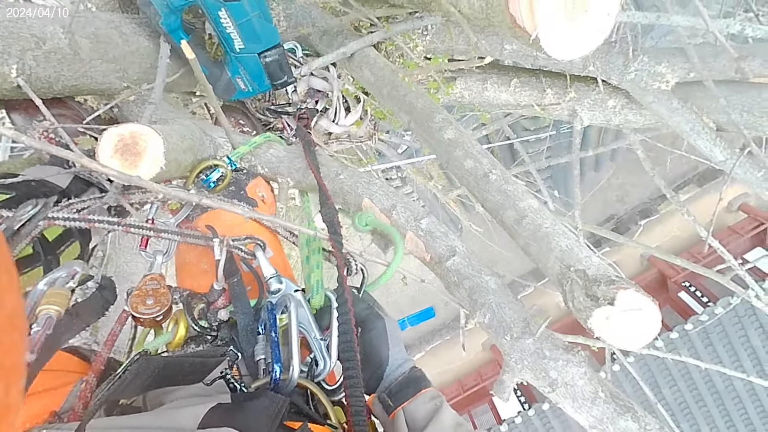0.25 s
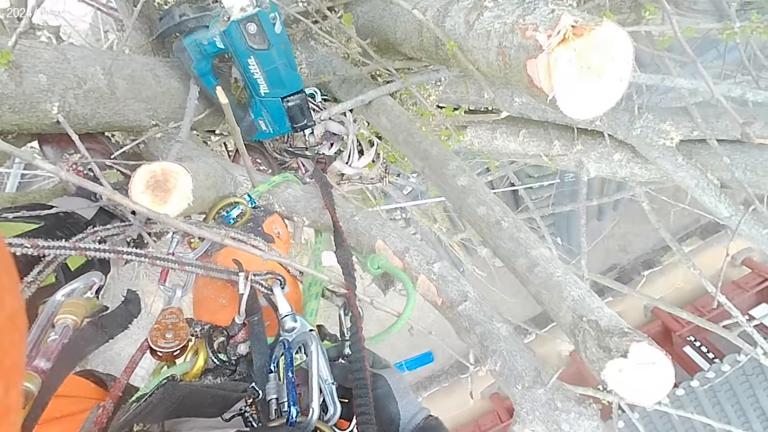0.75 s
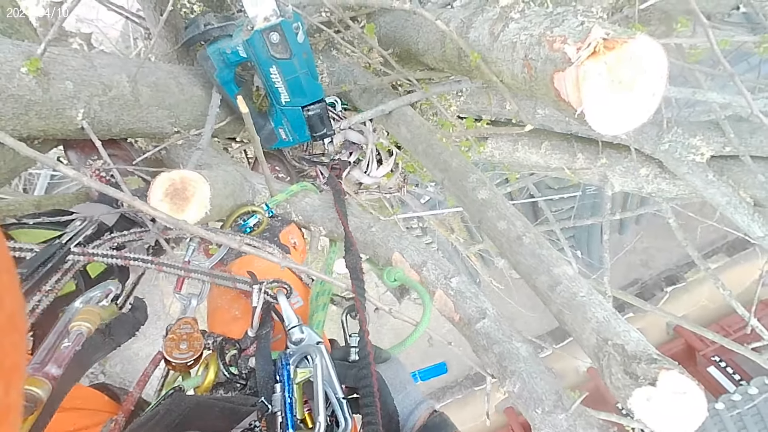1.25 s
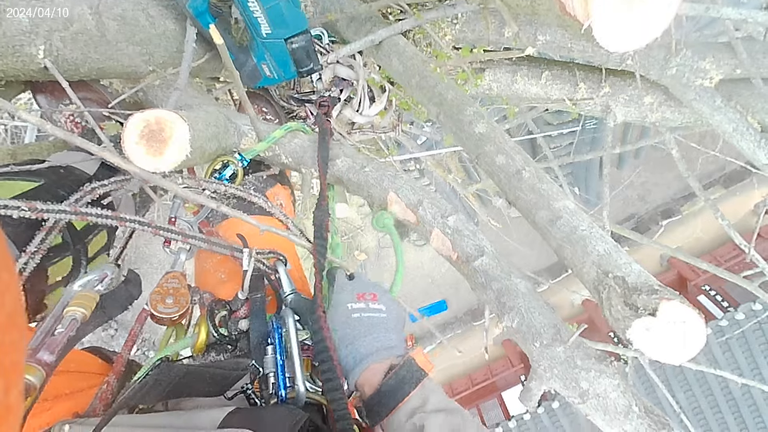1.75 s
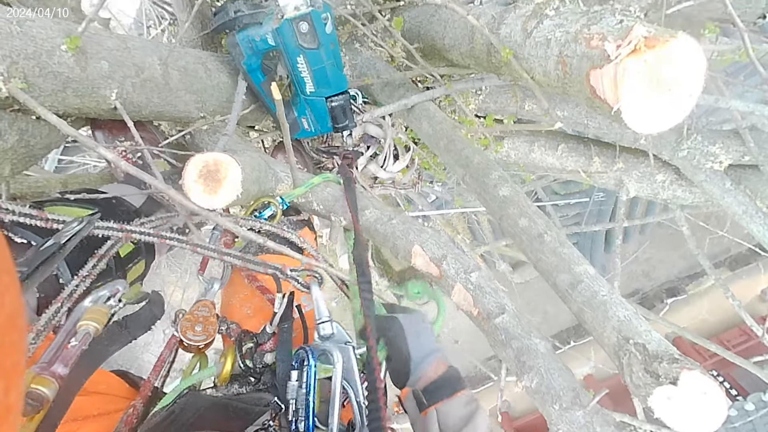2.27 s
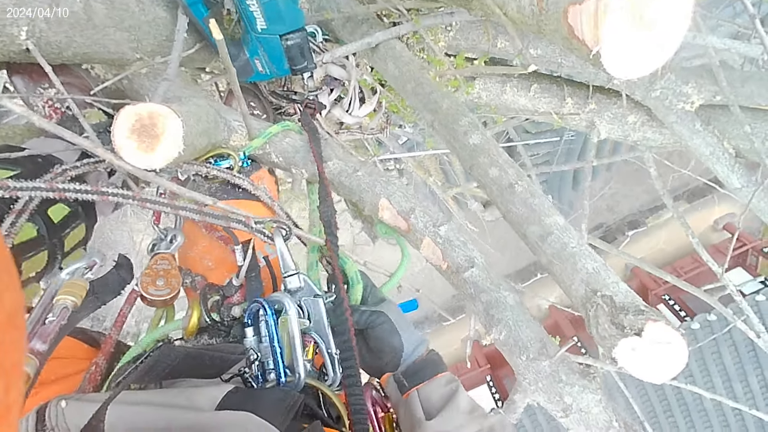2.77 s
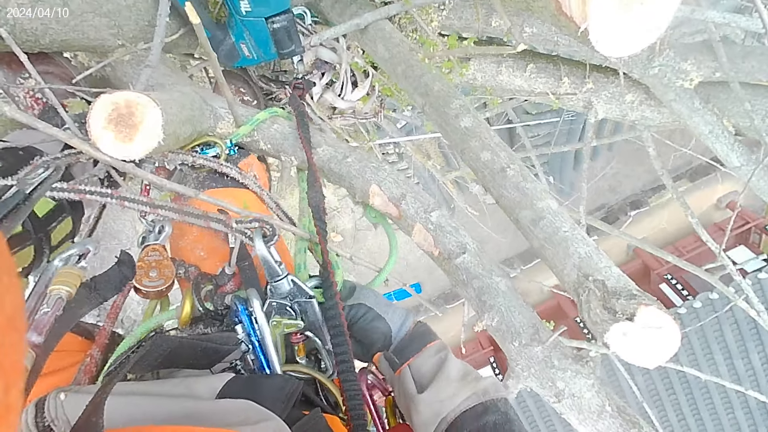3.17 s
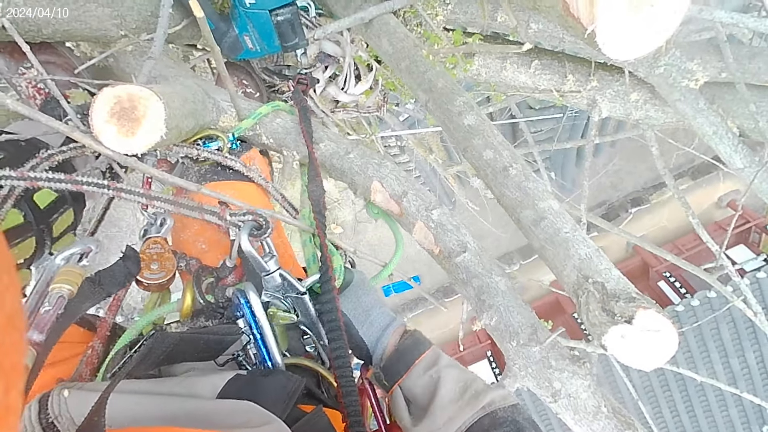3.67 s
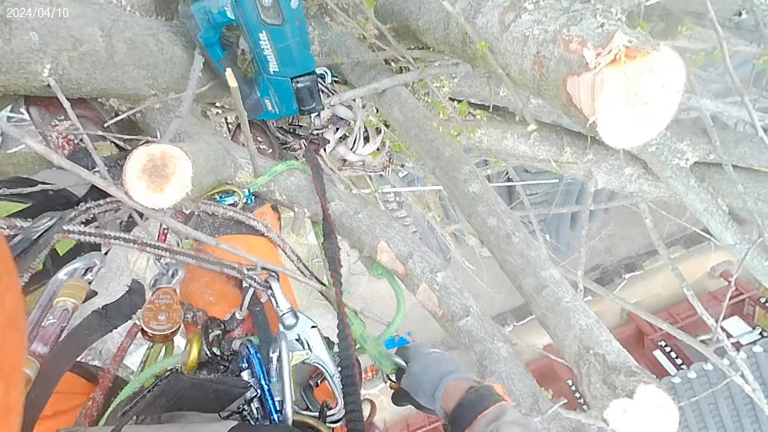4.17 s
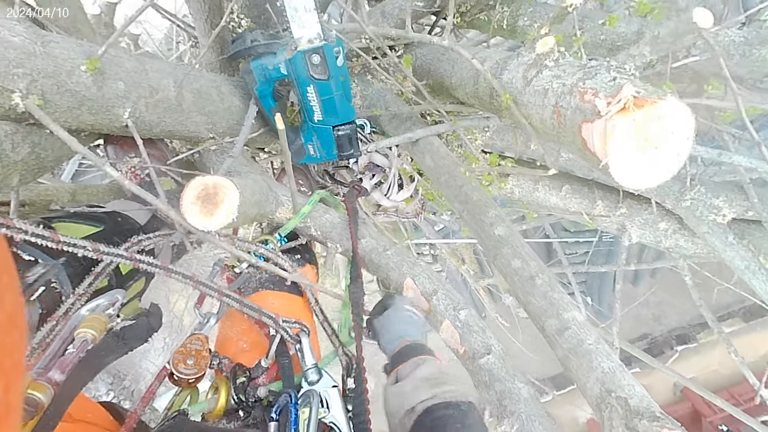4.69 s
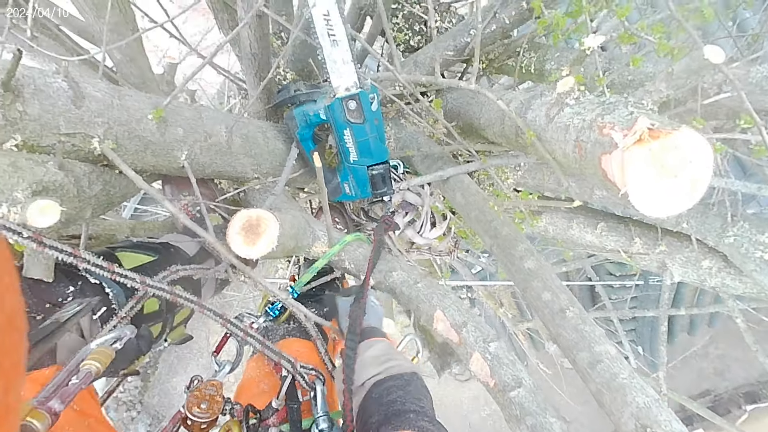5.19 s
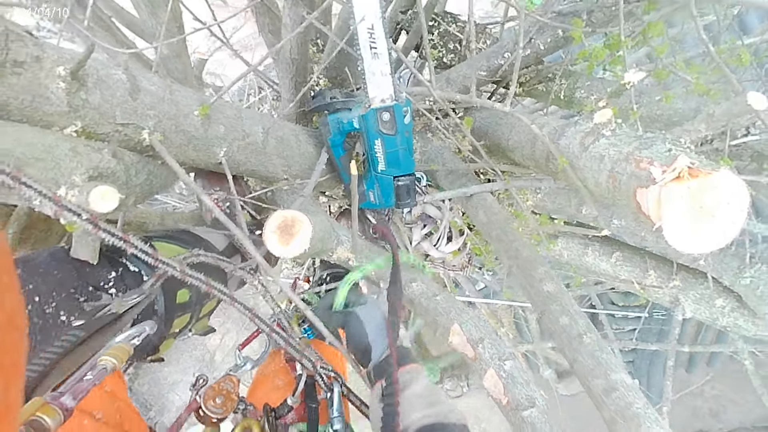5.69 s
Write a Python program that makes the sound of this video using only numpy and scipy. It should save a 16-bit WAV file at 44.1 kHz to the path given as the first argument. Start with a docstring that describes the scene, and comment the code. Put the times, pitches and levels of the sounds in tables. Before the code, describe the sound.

Close to a body-worn microphone outdoors, carabiners and buckles tick and clink in uneven clusters while a gloved hand rubs rope and cloth. Low wind rumble buffets throughout. It starts nearly quiet, gets busy after a second, thins around three, clicks harder near four, then two loud gates snap at about five and nearly six seconds.

```python
"""Climbing hardware high in a tree

A climber sorts carabiners and rope on a harness, close to the microphone of a helmet camera.
Metal parts click (noise bursts and decaying modes); some hang free and ring; gates slip and snap shut.
Rope and cloth rustle and scrape between them (uneven grains of filtered noise).
Light wind buffets the microphone (slow pressure noise with eddies) over a quiet outdoor background,
and the camera's own electronics pulse faintly (gated bands of noise).
"""
import sys
import numpy as np
from scipy import signal
from scipy.fft import rfft, irfft, next_fast_len
from scipy.io import wavfile
from scipy.ndimage import uniform_filter1d

SR = 44100
rng = np.random.default_rng(int(sys.argv[2]) if len(sys.argv) > 2 else 0)


def store_wav(level_fs):
    """Save 16-bit WAV to argv[1]."""
    pcm = np.round(np.clip(np.atleast_2d(level_fs), -1, 1) * 32767)
    wavfile.write(sys.argv[1], SR, pcm.T.astype(np.int16))


N = 261954
T = np.arange(N) / SR  # time in the scene, s
AGE = T[:8192]  # time since a sound began, s


def undb(db):
    """Decibels to gain."""
    return 10 ** (np.asarray(db) / 20)


def unit(x):
    """Scale to rms 1."""
    return x / np.sqrt(np.mean(x ** 2))


def struck(x, size=256):
    """Scale a blow so that its first milliseconds have rms 1."""
    return x / np.sqrt(np.mean(x[:size] ** 2))


def add(out, s, x):
    """Mix a sound in at time s."""
    i = max(int(s * SR), 0)
    out[i:i + len(x)] += x[:max(N - i, 0)]


def colour(x, points, tilt=0):
    """Minimum-phase filter through (pitch_hz, level_db) points, tilted in dB an octave."""
    size = next_fast_len(len(x) // 2 + 1) * 2
    hz, db = np.transpose(points)
    octave = np.log2(np.maximum(np.fft.rfftfreq(size, 1 / SR), 1))
    gain_db = np.interp(octave, np.log2(hz), db + tilt * np.log2(hz / hz[0]))
    # beyond the outer points the level falls 18 dB an octave
    octaves_outside = np.abs(octave - np.clip(octave, np.log2(hz[0]), np.log2(hz[-1])))
    cepstrum = irfft(np.log(undb(gain_db - 18 * octaves_outside)))
    # folding the cepstrum forward in time makes the filter causal
    cepstrum[1:size // 2] *= 2
    cepstrum[size // 2 + 1:] = 0
    response = np.exp(rfft(cepstrum))
    return irfft(rfft(x, size) * response)[:len(x)]


def walk(rate):
    """Slow chance with a spread near 1: random steps, smoothed twice."""
    k = int(SR / rate)
    steps = np.repeat(rng.standard_normal(N // k + 1), k)
    smooth = uniform_filter1d(uniform_filter1d(steps, k), k)
    return unit(smooth[:N])


def swells(table):
    """Summed power of bell-shaped swells, each (middle_s, half_length_s, level_db)."""
    return sum(undb(db) ** 2 * np.exp(-((T - s) / half_s) ** 2 / 2) for s, half_s, db in table)


def fade(t60):
    """Decay by 60 dB in t60 seconds."""
    return np.exp(-np.log(1000) * AGE / t60)


def contact(t60, spike, tail_db, tail_t60):
    """A sharp impact, a dense quickly damped rattle, and faint scatter from body and branches."""
    envelope = fade(t60) + undb(tail_db) * fade(tail_t60)
    x = rng.standard_normal(len(AGE)) * envelope
    x[0] += spike
    return x


def ring(modes, scatter_db=0, detune=0):
    """Decaying modes; where the part is struck and how it is held shift their weights and pitches."""
    chance = rng.standard_normal((len(modes), 2))
    total = np.zeros(len(AGE))
    for (hz, db, t60), (weight, shift) in zip(modes, chance):
        tone = np.sin(2 * np.pi * hz * (1 + detune * shift) * AGE)
        total += undb(db + scatter_db * weight) * fade(t60) * tone
    return struck(total)


# spectrum of the open air around the tree: pitch_hz, level_db
AIR = [(88, -28), (150, -2.5), (341, -11.5), (979, -21.5), (1080, -26.5), (1560, -30), (15100, -37),
       (16000, -41)]
AIR_DB, PULSING_DB = -52.5, -58.5  # middle level of the hush; pulsing noise before its pulses and swell
PULSE_S, PULSE_LEAD_S, PULSE_WIDTH_S = .1, .022, .009  # pulse period, head start, pulse half width
PULSING_PEAK_S, PULSING_SWELL_S = .8, 0.76  # time of the strongest pulsing; half width of its swell


def air():
    """Quiet outdoor background, plus the camera's own faint electronic pulsing at 2-3 kHz,
    ten times a second, that swells and dies away."""
    hush = unit(colour(rng.standard_normal(N), AIR)) * undb(AIR_DB + 0.29 * walk(5.0))
    from_pulse_s = (T + PULSE_LEAD_S) % PULSE_S - PULSE_S / 2
    pulses = np.exp(-(from_pulse_s / PULSE_WIDTH_S) ** 2)
    swell = np.exp(-((T - PULSING_PEAK_S) / PULSING_SWELL_S) ** 2)
    electronic = unit(colour(rng.standard_normal(N), [(1000, -9), (1900, -1), (2700, 0), (3400, -14)]))
    return hush + undb(PULSING_DB) * electronic * pulses * swell


# strength of the breeze at the microphone: time_s, level_db
BREEZE = [(0, -26.5), (.2, -22), (.65, -23.5), (1.4, -27.5), (1.8, -30), (2.45, -33), (2.75, -27.5),
          (3.65, -30), (4.3, -25), (4.65, -29.5), (5.2, -27), (5.94, -30.5)]
# gusts across the microphone: middle_s, half_length_s, level_db
GUSTS = [(.09, .015, -34.5), (.2, 0.017, -35), (.46, 0.042, -36.5), (.79, 0.027, -31.5),
         (1.04, 0.015, -32.5), (1.22, 0.079, -43), (1.525, 0.013, -34), (3.06, 0.016, -37.5),
         (4.32, 0.03, -37.5)]
# spectrum of the slow pressure swings on the microphone: pitch_hz, level_db
BUFFET = [(8, -3.5), (18, 7.5), (28, 1.5), (42, -6), (60, -10), (90, -28), (150, -31.5), (400, -52.5)]
EDDY_DB = -20  # eddies of the breeze, against its slow pressure
GUST_PUSH_DB = 5  # slow pressure of a gust, against its eddies


def wind():
    """Slow pressure swings, with smaller eddies strongest at their extremes; gusts stir eddies most."""
    breeze = undb(np.interp(T, *np.transpose(BREEZE)))
    gust = np.sqrt(swells(GUSTS))
    pressure = unit(colour(rng.standard_normal(N), BUFFET))
    eddy_points = [(50, -2.5), (75, 6), (110, 4), (150, -11.5), (230, -16), (450, -33.5)]
    eddies = colour(rng.standard_normal(N), eddy_points)
    eddies = unit(eddies * (1.1 + np.abs(pressure) ** 1.63))
    pressure_gain = np.hypot(breeze, undb(GUST_PUSH_DB) * gust)
    eddy_gain = np.hypot(undb(EDDY_DB) * breeze, gust)
    return pressure * pressure_gain + eddies * eddy_gain


# soft bumps on the camera, before the microphone's low cut: middle_s, width_s, level_db
BUMPS = [(.191, 0.0029, -13.5), (1.452, 0.0087, -11), (1.917, 0.003, -15), (2.102, 0.0076, -16.5),
         (2.163, 0.0042, -19.5), (3.845, 0.0083, -6.5), (3.881, 0.0024, -12), (4.1205, 0.005, -3.5)]


def bumps():
    """Soft pressure peaks; the microphone passes no steady pressure, so each swings back."""
    push = sum(undb(db) * np.exp(-(np.abs(T - s) / width) ** 1.56) for s, width, db in BUMPS)
    return signal.sosfilt(signal.butter(1, 18, "high", fs=SR, output="sos"), push)


# moves of the hand along rope and harness: middle_s, half_length_s, level_db
MOVES = [(.55, 0.061, -8), (1.56, 0.083, -3), (1.8, 0.12, -7), (2.28, 0.078, -3.5), (2.5, .06, -0.5),
         (2.86, 0.064, -7), (4.07, 0.11, -4), (4.92, 0.092, -4.5), (5.71, .07, -2.5), (5.89, 0.078, 4.5)]
REST_DB = -8  # effort of the resting hand


def effort():
    """How busy the hand is, in dB: at rest, or swelling with each move."""
    return 10 * np.log10(undb(REST_DB) ** 2 + swells(MOVES))


# spectrum of rope and cloth rubbing: pitch_hz, level_db
RUB = [(200, -14.5), (400, -1.5), (650, -2), (1000, -5), (1400, -11.5), (3000, -20), (6000, -30)]
# bright spectrum shared by fibre hiss and metal ticks: pitch_hz, level_db
TREBLE = [(2500, -25), (4000, -3.5), (5000, 2), (7200, 1), (10000, 1), (11500, -4), (13000, -12),
          (16000, -21)]
RUB_DB, HISS_DB = -52.5, -66  # rope and cloth at an effort of 0 dB
RUB_PER_EFFORT, HISS_PER_EFFORT = 0.74, 1.37  # dB per dB
SLIPS_PER_S, SLIP_FADE_S = 220, 0.0031  # rate of fibre slips; time constant of their power


def rustle():
    """Rope and glove fibres catch and slip in small uneven grains, louder and brighter with effort."""
    effort_db = effort()
    slip_db = 4.5 * np.minimum(rng.exponential(size=N), 3)
    slips = (rng.random(N) < SLIPS_PER_S / SR) * undb(slip_db)
    slip_power = signal.lfilter([1], [1, -np.exp(-1 / (SLIP_FADE_S * SR))], slips ** 2)
    grip = np.sqrt(0.25 + unit(slip_power))
    rub = unit(colour(grip * rng.standard_normal(N), RUB))
    hiss = unit(colour(grip * rng.standard_normal(N), TREBLE))
    rub_gain = undb(RUB_DB + RUB_PER_EFFORT * effort_db)
    hiss_gain = undb(HISS_DB + HISS_PER_EFFORT * effort_db)
    return rub * rub_gain + hiss * hiss_gain


# parts and rope sliding over each other: middle_s, half_length_s, pitch_hz, level_db
SCRAPES = [(1.585, 0.028, 6000, -55), (2.223, 0.0074, 6030, -52), (2.314, 0.037, 6500, -57),
           (2.528, .06, 5540, -65), (2.882, 0.01, 8360, -48), (3.487, 0.022, 5300, -53.5),
           (4.07, 0.018, 4940, -56.5), (4.173, 0.018, 9000, -61), (5.685, 0.043, 9800, -58.5),
           (5.816, 0.013, 7050, -47.5)]


def scrapes():
    """Short slides: a dense run of tiny slips that swells and stops."""
    out = np.zeros(N)
    middle = AGE[-1] / 2
    for s, half_s, hz, db in SCRAPES:
        slips = rng.standard_normal(len(AGE)) * (rng.random(len(AGE)) < 2500 / SR)  # 2500 a second
        grain = unit(colour(slips, [(hz / 4, -17), (hz / 2.9, -9), (hz, 0), (hz * 2.4, -14)]))
        swell = np.exp(-((AGE - middle) / half_s) ** 2 / 2)
        add(out, s - middle, undb(db) * grain * swell)
    return out


# modes of the bunch of hardware, damped by glove and webbing: pitch_hz, level_db, t60_s
BUNCH = [(4610, -3, .03), (5600, -5, .04), (5950, -4, .03), (6900, -1, .028), (7620, 0, .028),
         (9280, -4, .022), (10000, -5, .025), (11050, -12, .032), (12400, -17, .02)]
# middle spectrum, the body of a metal contact: pitch_hz, level_db
MIDDLE = [(900, -7.5), (1450, -2.5), (1900, 3), (2700, -3), (3600, 3), (5000, -18)]
TOUCH_DB, TOUCH_PER_EFFORT = -57, 1.47  # base level at an effort of 0 dB; dB per dB
TOUCHES_PER_S = 5  # mean rate for each part


def jostle(count=6):
    """Tiny touches between a few parts of the bunch, stronger while the hand is busy."""
    out = np.zeros(N)
    strength = undb(TOUCH_DB + TOUCH_PER_EFFORT * np.minimum(effort(), 2))
    for _ in range(count):
        bunch = undb(-2.5) * ring(BUNCH, scatter_db=-3, detune=0.019)
        tick = struck(colour(contact(0.011, spike=4.9, tail_db=-19, tail_t60=0.066), TREBLE))
        middle = undb(-7.5) * struck(colour(contact(.025, spike=4.3, tail_db=-17, tail_t60=.1), MIDDLE))
        touches = (rng.random(N) < TOUCHES_PER_S / SR) * undb(3 - 9 * rng.random(N))
        out += signal.oaconvolve(touches * strength, bunch + tick + middle)[:N]
    return out


# the loaded hardware clunking: start_s, level_db
CLUNKS = [(5.004, -43.5), (5.7895, -28.5), (5.808, -36), (5.837, -38.5)]
# modes of the loaded hardware: pitch_hz, level_db, t60_s
CLUNK = [(293, -2, 0.15), (418.5, -20, 0.057), (640, -0.5, 0.033), (800, -12, 0.042), (992, 8.5, 0.03),
         (1470, 3.5, 0.038), (1800, 3, 0.056), (1970, -9, .04), (2300, 3.5, 0.038), (2900, 1, 0.032),
         (3310, 0, .035), (4380, -15, .03)]
# spectrum of a dull knock: pitch_hz, level_db
KNOCK = [(200, -22), (400, -6.5), (520, -9.5), (640, -0.5), (760, -5), (950, -6.5), (1300, -17.5),
         (2200, -33.5)]


def clunks():
    """Under load the hardware rings with its low modes, over a dull knock."""
    out = np.zeros(N)
    for s, db in CLUNKS:
        body = undb(0.5) * ring(CLUNK, scatter_db=1.5, detune=0.006)
        knock = undb(-6) * struck(colour(contact(0.027, spike=17, tail_db=-6, tail_t60=0.17), KNOCK))
        add(out, s, undb(db) * (body + knock))
    return out


# modes of a carabiner, a small ring, a held gate and a buckle, each: pitch_hz, level_db, t60_s
CARABINER = [(7720, 4.5, 0.036), (7957, -6, .035), (7720, -28, 0.21), (7750, -31, .15), (7400, -27, 0.079),
             (9464, -12, .03), (10590, -21, .085), (10870, -14.5, 0.076)]
RING = [(5152, -28, .08), (6480, -5, 0.055), (8220, -3, 0.046), (9960, -8, 0.051)]
GATE = [(8100, 7, 0.014), (8260, -7, 0.016), (9000, -21, 0.018)]
BUCKLE = [(5700, -1, .16), (8450, -3, 0.132), (12400, -9, .08)]
# free parts ringing: start_s, part (0 carabiner, 1 ring, 2 gate, 3 buckle), level_db
CLINKS = [(2.044, 3, -60.5), (4.092, 0, -45), (4.245, 3, -58), (4.961, 1, -51), (4.995, 0, -41),
          (5.0043, 0, -22), (5.074, 0, -52.5), (5.723, 1, -34.5), (5.7929, 2, -26)]


def clinks():
    """Parts that hang free ring on with their own modes."""
    out = np.zeros(N)
    parts = (CARABINER, RING, GATE, BUCKLE)
    for s, part, db in CLINKS:
        add(out, s, undb(db) * ring(parts[int(round(part))]))
    return out


# gates slipping and snapping shut:
# start_s, level_db (crack), tilt (dB an octave), rebound_s (after the crack), rebound_db (against it)
SNAPS = [(4.996, -41, 5, .003, 2), (5.0036, -31, 6.5, 0.0034, 2), (5.7893, -23, -0.9, 0.0021, -5)]
# spectrum of a gate's crack before tilting: pitch_hz, level_db
CRACK = [(150, -12), (290, 14), (400, -7.5), (1000, 10), (1600, 7.5), (2300, 4.5), (4000, -1), (8000, 1),
         (10500, -2.5), (12500, -14), (16000, -23)]


def gates():
    """A sprung gate cracks against the nose of its carabiner and rebounds once."""
    out = np.zeros(N)
    for s, crack_db, tilt, rebound_s, rebound_db in SNAPS:
        crack = struck(colour(contact(0.031, spike=10.0, tail_db=-20, tail_t60=0.12), CRACK, tilt))
        bounce = contact(0.015, spike=2.4, tail_db=-26, tail_t60=0.11)
        rebound = struck(colour(bounce, CRACK, tilt + 1))
        add(out, s, undb(crack_db) * crack)
        add(out, s + rebound_s, undb(crack_db + rebound_db) * rebound)
    return out


# the clearer contacts of the hardware, close to the microphone, levels before the layers' own trims:
# start_s, treble_db, knock_db, pitch_hz (strongest ring)
CLICKS = [(.3437, -41.5, -48, 5100), (0.4433, -42, -42.5, 4350), (.4733, -36.5, -45, 4500),
          (.5551, -41, -47, 5500), (1.114, -44, -48.5, 5260), (1.394, -22, -43, 9040),
          (1.4369, -26.5, -40, 6820), (1.5762, -26, -48, 4500), (1.592, -20, -44, 7130),
          (1.6056, -17, -45, 6940), (1.6837, -33, -47, 5580), (1.6913, -20.5, -39, 9700),
          (1.8305, -29.5, -43, 7800), (1.955, -32, -61, 10200), (2.0414, -34, -60, 5570),
          (2.065, -34, -41.5, 5210), (2.2212, -32, -40, 4900), (2.2395, -29.5, -62, 5010),
          (2.2682, -15, -44, 7650), (2.2964, -24, -40.5, 4250), (2.3136, -35, -60, 6710),
          (2.3296, -35, -43, 5530), (2.4204, -32, -56, 4600), (2.4354, -33.5, -60, 7620),
          (2.4892, -21.5, -45, 6300), (2.5321, -25, -42, 4920), (2.5581, -30.5, -48, 5800),
          (2.578, -40, -40, 4920), (2.6349, -39, -44, 5100), (2.822, -31, -70, 6700),
          (2.8495, -22, -64, 10200), (2.8724, -29, -49, 10000), (2.9101, -18, -45, 7300),
          (3.04, -37.5, -49.5, 7630), (3.2072, -34.5, -47.5, 4870), (3.485, -31, -38, 6800),
          (3.5132, -35, -50, 4880), (3.7404, -27.5, -41, 8700), (3.764, -24, -33, 7100),
          (3.7768, -14, -27, 8960), (3.7862, -23.5, -55, 6600), (3.9183, -29.5, -38, 10700),
          (3.9608, -32.5, -46, 10900), (3.9866, -28.5, -44, 5440), (4.0809, -28, -44, 4560),
          (4.1004, -18.5, -30.5, 4830), (4.116, -18, -38, 4630), (4.148, -33, -44.5, 10900),
          (4.1807, -34.5, -50, 5350), (4.245, -31.5, -58, 5570), (4.3938, -33.5, -60, 6700),
          (4.4148, -31, -50, 9700), (4.488, -39, -44.5, 5180), (4.6902, -33, -75, 9600),
          (4.7074, -28, -68, 4990), (5.4019, -23.5, -41.5, 9650), (5.6967, -29.5, -43, 10400),
          (5.7177, -27.5, -45, 9800), (5.8349, -20.5, -38.5, 6340), (5.8566, -35, -54, 6660),
          (5.896, -22, -36.5, 4600), (5.9314, -29, -51, 8010)]
CLICK_T60_S, CLICK_MID_HZ = .031, 7250  # decay of an ordinary click; ring of a part of middling size
# harder contacts are drier: the decay halves every HALVING_DB above an ordinary click
ORDINARY_DB, HALVING_DB = -30, 28
# the body of a click grows with its tick and its knock (dB per dB)
MIDDLE_DB, MIDDLE_PER_TREBLE, MIDDLE_PER_KNOCK = -24, 0.36, 0.27


def clicks():
    """Each contact gives a bright tick, a short ring of the part and of the bunch, a body and a knock."""
    out = np.zeros(N)
    for s, treble_db, knock_db, ring_hz in CLICKS:
        tilt = 9 * np.log2(ring_hz / CLICK_MID_HZ)  # smaller parts ring higher and tick brighter
        t60 = CLICK_T60_S * 2 ** ((ORDINARY_DB - treble_db) / HALVING_DB)
        middle_db = MIDDLE_DB + MIDDLE_PER_TREBLE * treble_db + MIDDLE_PER_KNOCK * knock_db

        tick = contact(t60, spike=6.3, tail_db=-22.5, tail_t60=0.076)
        tick = undb(-19.5) * struck(colour(tick, TREBLE, tilt))
        part = undb(-21.5) * ring([(ring_hz, 0, .025), (ring_hz * 0.88, -4, .018)], detune=0.0013)
        bunch = undb(-22.5) * ring(BUNCH, scatter_db=8, detune=0.0314)
        middle = contact(t60, spike=6.8, tail_db=-17, tail_t60=0.13)
        middle = undb(-6) * struck(colour(middle, MIDDLE))
        knock = contact(0.03, spike=10.0, tail_db=-13, tail_t60=0.11)
        knock = undb(-1.5) * struck(colour(knock, KNOCK))

        treble = undb(treble_db) * (tick + part + bunch)
        add(out, s, treble + undb(middle_db) * middle + undb(knock_db) * knock)
    return out


def scene():
    """All sources summed at one microphone, from the background to the hardware."""
    background = air() + wind() + bumps()
    hardware = scrapes() + jostle() + clunks() + clinks() + gates() + clicks()
    return (background + rustle() + hardware)[None]


TOP_HZ = 16000


def record(dry):
    """The camera cuts the top of the band with a steep low-pass."""
    return signal.sosfilt(signal.ellip(10, .2, 80, TOP_HZ, fs=SR, output="sos"), dry)


dry = scene()
out = record(dry)
store_wav(out)
```